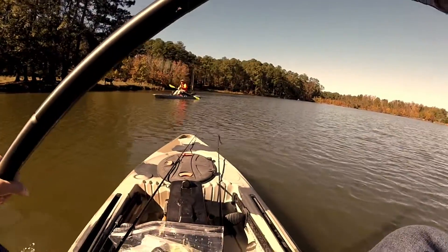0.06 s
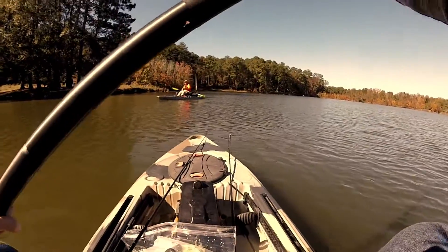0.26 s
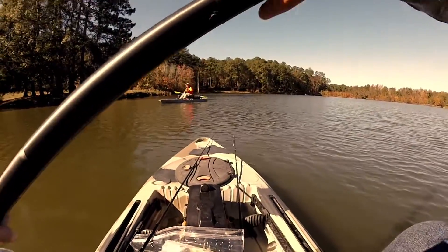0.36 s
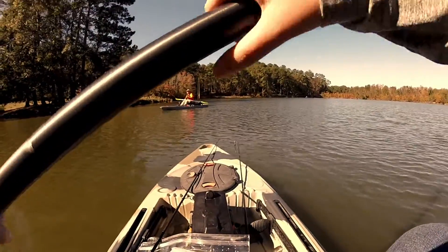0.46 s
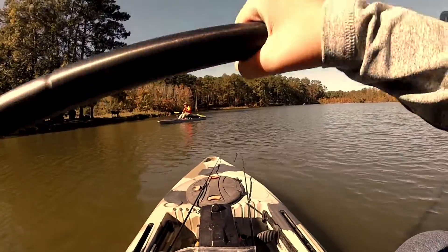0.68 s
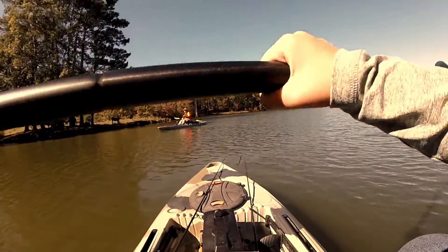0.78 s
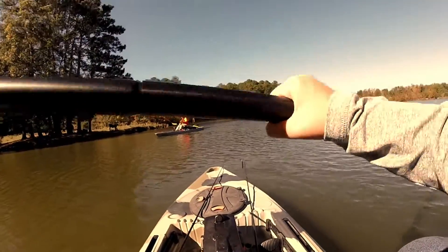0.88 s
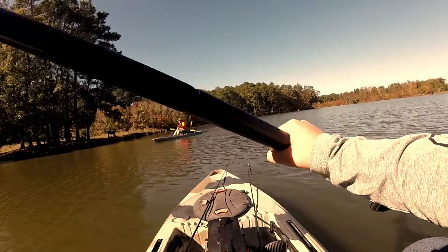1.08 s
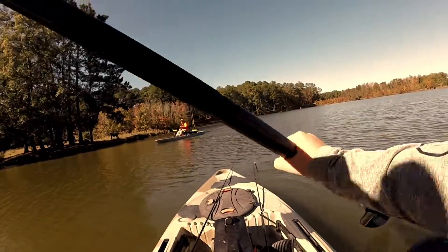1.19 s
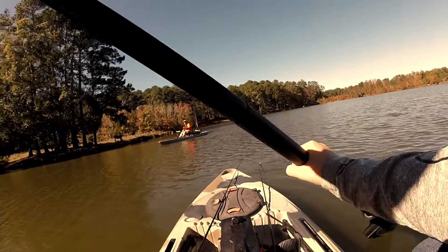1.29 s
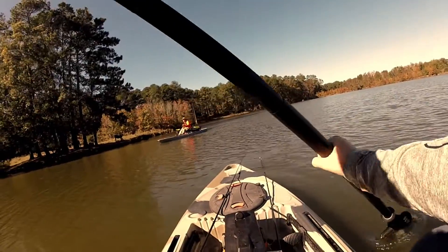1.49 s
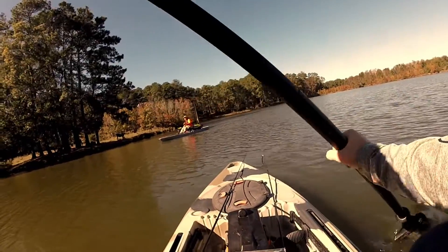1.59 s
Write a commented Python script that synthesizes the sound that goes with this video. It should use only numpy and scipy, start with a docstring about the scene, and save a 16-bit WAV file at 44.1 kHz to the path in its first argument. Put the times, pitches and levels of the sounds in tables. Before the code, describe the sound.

A kayak paddle moves through pond water, heard close from the seat. Water gurgles off one stroke, a sleeve swishes softly, then the blade plunges in with plops, deep gulps and a trickle of bubbles.

```python
"""A kayak paddle on a pond, heard from the paddler's seat. Water gurgles off the last stroke, a sleeve
swishes past as the paddle swings over, then the blade plunges in: trapped air pockets plop, smaller
and higher as the pull goes on, over deep gulps of the eddy and a frothy wash. Bubbles trickle off
the blade, drops of spray patter and wind rumbles faintly."""
import sys
import numpy as np
from scipy.fft import rfft, irfft, next_fast_len
from scipy.io import wavfile
from scipy.ndimage import map_coordinates

SR = 44100
rng = np.random.default_rng(int(sys.argv[2]) if len(sys.argv) > 2 else 0)


def to_wav(sig):
    """Store sig (one row per channel, or 1-D mono) as 16-bit WAV at the path in sys.argv[1].

    Samples outside -1..1 are clipped; the rate is SR.
    """
    pcm = np.clip(np.atleast_2d(sig), -1, 1) * 32767
    pcm = np.round(pcm).astype(np.int16)
    wavfile.write(sys.argv[1], SR, pcm.T)  # frames by channels


N = 72765
TOP_HZ = 15300


def amp(db):
    """Decibels to gain."""
    return 10 ** (np.asarray(db) / 20)


def unit(x):
    """Scale to rms 1."""
    return x / np.sqrt(np.mean(x ** 2) + 1e-20)


def fader(points):
    """Gain per sample from (t/s, level/dB) points."""
    return amp(np.interp(np.arange(N) / SR, *np.transpose(points)))


def wobble(rate):
    """A smooth random curve, rate knots a second."""
    knots = rng.standard_normal(int(N * rate / SR) + 4)
    return map_coordinates(knots, [np.arange(N) * rate / SR])


def filtered(x, response):
    """Filter x by a gain that depends on frequency."""
    size = next_fast_len(N + SR // 2)
    return irfft(rfft(x, size) * response(np.fft.rfftfreq(size, 1 / SR)), size)[:N]


def colour(x, eq):
    """Shape x with an EQ curve of (f/Hz, level/dB) points."""
    f, db = np.transpose(eq)
    return filtered(x, lambda hz: amp(np.interp(np.log(hz + 1), np.log(f), db)))


def noise(eq):
    """Noise of rms 1, coloured by an EQ curve."""
    return unit(colour(rng.standard_normal(N), eq))


def add(track, start, sound):
    """Mix a sound into the track, start seconds in."""
    i = max(round(start * SR), 0)
    part = track[i:i + len(sound)]
    part += sound[:len(part)]


def decay(t, t60):
    """Exponential fade, 60 dB in t60."""
    return np.exp(-np.log(1000) * t / t60)


def bubble(hz, t60):
    """An air pocket rings with a soft attack and climbs in pitch as it nears the surface."""
    rise_share, rise_s, attack_cycles = 0.163, 0.04, 0.55
    t = np.arange(int(t60 * SR) + 2) / SR
    pitch = hz * (1 + rise_share * np.tanh(t / rise_s))
    cycles = np.cumsum(pitch) / SR
    attack = np.tanh(cycles / attack_cycles) ** 2
    return np.sin(2 * np.pi * cycles) * decay(t, t60) * attack


def swarm(per_s, centre_hz, spread, ring_cycles, scatter_db):
    """Many bubbles of random moment, size and strength, rms 1; the tiniest are the faintest."""
    out = np.zeros(N)
    draws = rng.random((1500, 3))
    for when, smallness, strength in draws[:int(per_s * N / SR)]:
        hz = min(centre_hz * (smallness / (1 - smallness)) ** (spread / 2), TOP_HZ)
        gain = amp(scatter_db * strength) * min(centre_hz / hz, 1)
        add(out, when * N / SR, gain * bubble(hz, ring_cycles / hz))
    return unit(out)


def wash():
    """Stirred water: a flickering wash, frothy with small bubbles, over a lower slosh."""
    # Fader rides of the wash and the slosh: t/s, relative level/dB
    wash_ride = [(0, -45.5), (.2, -47), (.34, -43.5), (.52, -42), (.77, -48.5), (.88, -43), (.94, -48.5),
                 (1.08, -46.5), (1.15, -50.5), (1.3, -49), (1.41, -53.5), (1.65, -57.5)]
    slosh_ride = [(0, -53), (.21, -44.5), (.29, -41), (.58, -39.5), (.69, -46), (.79, -46), (.87, -35.5),
                  (.96, -46.5), (1.08, -53.5), (1.32, -55.5), (1.37, -55.5), (1.42, -53.5), (1.65, -56)]
    # Tone of the wash and the slosh: f/Hz, relative level/dB
    wash_eq = [(200, -9.5), (550, -3.5), (1000, 1.5), (1700, 1.5), (2400, -7), (4000, -11.5), (14000, -62)]
    slosh_eq = [(90, 3), (190, 0.5), (470, 1), (650, -9.5), (1100, -8), (3000, -89)]
    froth = swarm(per_s=420, centre_hz=1242, spread=0.55, ring_cycles=16, scatter_db=27.5)
    rush = amp(-5.5 + 2.1 * wobble(69.74)) * noise(wash_eq)
    slosh = amp(-1 + 0.87 * wobble(40.47)) * noise(slosh_eq)
    return fader(wash_ride) * (rush + amp(-7.5) * froth) + fader(slosh_ride) * slosh


def air():
    """Low rumble of wind and moving water, and the faint hiss of the open pond."""
    # Fader ride of the rumble: t/s, relative level/dB
    rumble_ride = [(0, -44), (.15, -41), (.41, -36.5), (.52, -41.5), (.79, -47.5), (.92, -24),
                   (1.07, -35.5), (1.28, -30), (1.42, -39), (1.65, -49)]
    # Tone of the rumble and the hiss: f/Hz, relative level/dB
    rumble_eq = [(10, -46), (30, -1), (75, -4), (115, -8), (300, -29), (900, -79)]
    hiss_eq = [(1000, 0.5), (9000, -11.5), (15000, -24)]
    rumble = amp(-1.5) * fader(rumble_ride) * noise(rumble_eq)
    return rumble + amp(-61.5) * noise(hiss_eq)


def drops():
    """Fine spray from the raised blade ticks on the pond and leaves tiny ringing bubbles."""
    ticks = swarm(per_s=70, centre_hz=8500, spread=0.606, ring_cycles=6.3, scatter_db=11)
    rings = swarm(per_s=200, centre_hz=3900, spread=0.606, ring_cycles=24, scatter_db=26)
    return amp(-65) * rings + amp(-77) * ticks


def plops():
    """Each cavity closes with a short wet splat and rings as a bubble."""
    # Air pockets trapped by the blade and by drops: t/s, f/Hz, relative level/dB, t60/s
    pockets = [(0.029, 1150, -36, 0.032), (0.242, 1760, -40, 0.024), (.270, 1166, -29.5, 0.017),
               (.339, 1130, -28.5, 0.0094), (0.3427, 6240, -44, 0.008), (.349, 950, -27, 0.0076),
               (0.394, 1540, -30, 0.0099), (.497, 1910, -39.5, 0.029), (0.516, 1357, -30.5, 0.011),
               (0.733, 412, -32, 0.028), (0.743, 2360, -37.5, 0.018), (0.833, 1080, -33.5, 0.042),
               (0.848, 1140, -22.5, 0.018), (0.8588, 358, -24.5, 0.027), (.867, 930, -20.5, 0.012),
               (0.8738, 1120, -22.5, .014), (0.895, 1110, -28, 0.018), (0.9029, 944, -20.5, 0.015),
               (.9075, 1070, -34, 0.047), (.932, 182, -28.5, 0.15), (0.963, 1186, -32.5, 0.033),
               (0.998, 1123, -29, 0.04), (1.036, 1265, -35.5, 0.12), (1.075, 1724, -32, 0.0098),
               (1.079, 1150, -23.5, 0.014), (1.084, 1080, -33.5, 0.016), (1.122, 1482, -38.5, 0.048),
               (1.146, 1460, -35, 0.01), (1.216, 2020, -39.5, 0.011), (1.241, 1465, -41, 0.026),
               (1.260, 1660, -37, 0.015), (1.314, 1810, -38.5, 0.021), (1.36, 317, -39.5, 0.076),
               (1.474, 5260, -51.5, 0.016), (1.559, 2610, -42.5, 0.011), (1.591, 1083, -38.5, 0.014),
               (1.592, 617, -42.5, 0.034)]
    # Tone of the splat: f/Hz, relative level/dB
    splat_eq = [(300, -30), (850, 6.5), (1300, -2), (3000, -12.5), (9000, -66)]
    ring_db, splat_db = 2.5, -10
    rings, bursts = np.zeros(N), np.zeros(N)
    t = np.arange(SR // 10) / SR
    for start, hz, db, t60 in pockets:
        add(rings, start, amp(db) * bubble(hz, t60))
        add(bursts, start, amp(db) * decay(t, t60=0.014))
    splats = bursts.std() * unit(colour(bursts * rng.standard_normal(N), splat_eq))
    return amp(ring_db) * rings + amp(splat_db) * splats


def gurgles():
    """The swirl squeezes or stretches air pockets: each swells and glides as a rough, fluttering tone."""
    # Pockets changing size: t/s, length/s, first f/Hz, last f/Hz, level/dB before the flutter
    glides = [(.07, 0.088, 438.4, 349.4, -41.5), (0.243, 0.0475, 219, 382, -33.5),
              (.294, 0.036, 365, 460, -36.5), (0.391, 0.042, 951, 1150, -38.5),
              (.575, 0.047, 411, 566, -39), (0.639, 0.047, 1101, 856, -38.5)]
    jitter_rad, flutter_db = 0.65, 3
    out = np.zeros(N)
    for start, length, first_hz, last_hz, db in glides:
        progress = np.linspace(0, 1, int(length * SR))
        phase = 2 * np.pi * np.cumsum(first_hz + (last_hz - first_hz) * progress) / SR
        jitter = jitter_rad * wobble(first_hz / 2)[:len(progress)]
        add(out, start, amp(db) * np.sin(np.pi * progress) * np.sin(phase + jitter))
    return out * amp(flutter_db * wobble(200))


def gulps():
    """Heavily damped throbs of a cycle or two, with a weak octave, as water closes behind the blade."""
    # Deep throbs of the eddy: centre t/s, f/Hz, level/dB
    throbs = [(0.285, 89, -31.5), (0.429, 69.5, -22.5), (0.609, 105, -31), (0.909, 57.5, -21),
              (0.928, 75, -21.5), (0.943, 110, -27.5), (0.965, 86, -21), (1.038, 121.3, -24),
              (1.103, 87, -22), (1.132, 55.4, -25.5), (1.18, 90, -25), (1.229, 99, -21.5),
              (1.245, 68.4, -19), (1.293, 79.4, -25), (1.369, 100, -29.5), (1.515, 93, -36),
              (1.609, 62, -32.5)]
    swell_s, octave_db = 0.0055, -14.5
    out = np.zeros(N)
    t = np.arange(-(SR // 20), SR // 20) / SR
    swell = 1 / np.cosh(t / swell_s)
    for centre, hz, db in throbs:
        phase = 2 * np.pi * hz * t
        tone = np.sin(phase) + amp(octave_db) * np.cos(2 * phase)
        add(out, centre + t[0], -amp(db) * swell * tone)
    return out


def swish(eq, span_s, db, fade_s, glide_hz, width_hz, band_db):
    """Sliding cloth: a grainy hiss with a bright band that glides as it swells or fades."""
    start, end = span_s
    t = np.arange(N) / SR
    ramp = np.clip(np.minimum(t - start, end - t) / fade_s, 0, 1)
    contact = np.sin(np.pi / 2 * ramp) ** 2
    phase = 2 * np.pi * np.cumsum(np.interp(t, span_s, glide_hz)) / SR
    band = unit(wobble(width_hz) * np.cos(phase) + wobble(width_hz) * np.sin(phase))
    band_gain = amp(np.interp(t, span_s, band_db))
    grain = amp(0.8 * wobble(200) + 0.7 * wobble(20))
    return amp(db) * contact * grain * (noise(eq) + band_gain * band)


def sleeve():
    """The sleeve brushes past as the paddle swings over: a firm swish, then a light, rising one."""
    # Tone of the cloth under firm and light contact: f/Hz, relative level/dB
    firm_eq = [(1000, -33), (2400, -7), (3700, -2), (4100, 4.5), (4900, -2.5), (7600, -2.5), (9300, -8.5),
               (10900, -7.5), (11450, 2), (12100, -6.5), (15000, -14)]
    light_eq = [(1000, -29), (4100, 0.5), (7000, -3), (8500, -6.5), (13000, -6.5), (15000, -4)]
    firm = swish(firm_eq, span_s=(0.388, 0.672), db=-47, fade_s=0.058,
                 glide_hz=(6900, 6450), width_hz=900, band_db=(-22, -2))
    light = swish(light_eq, span_s=(0.64, 1.07), db=-55.5, fade_s=0.085,
                  glide_hz=(9000, 14300), width_hz=2400, band_db=(-3, -7))
    return firm + light


def trickle():
    """A dense run of short bubbles streams off the blade during the pull."""
    start_s, length_s = 1.042, 0.32
    progress = np.clip((np.arange(N) / SR - start_s) / length_s, 0, 1)
    swell = np.abs(np.sin(np.pi * progress)) ** 0.5
    bubbles = swarm(per_s=230, centre_hz=1534, spread=0.22, ring_cycles=22, scatter_db=13)
    return amp(-49.5) * swell * bubbles


def scene():
    """A mono mix, everything close and dry over open water."""
    return (sleeve() + plops() + gurgles() + gulps() + wash() + trickle() + drops() + air())[None]


def record(dry):
    """A brick-wall low-pass takes off everything above TOP_HZ."""
    return filtered(dry[0], lambda hz: hz < TOP_HZ)[None]


dry = scene()
out = record(dry)
to_wav(out)
```